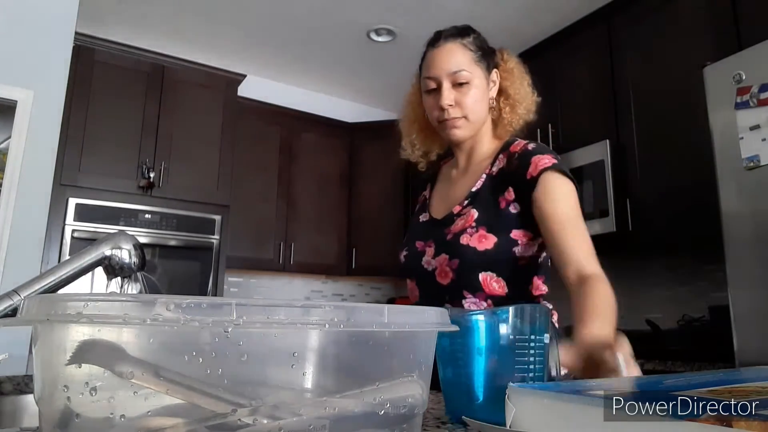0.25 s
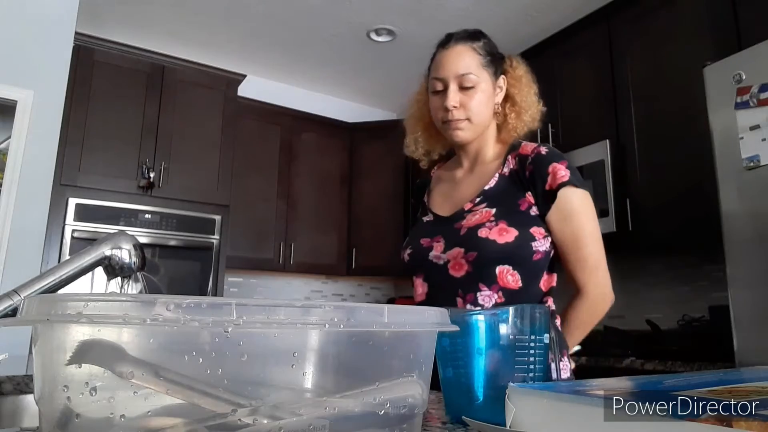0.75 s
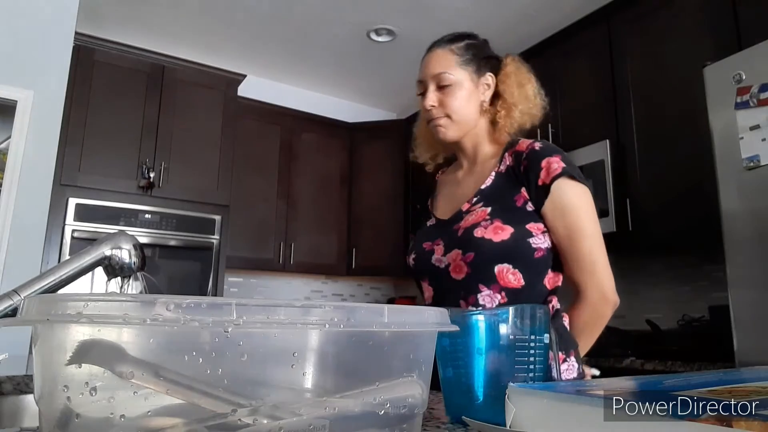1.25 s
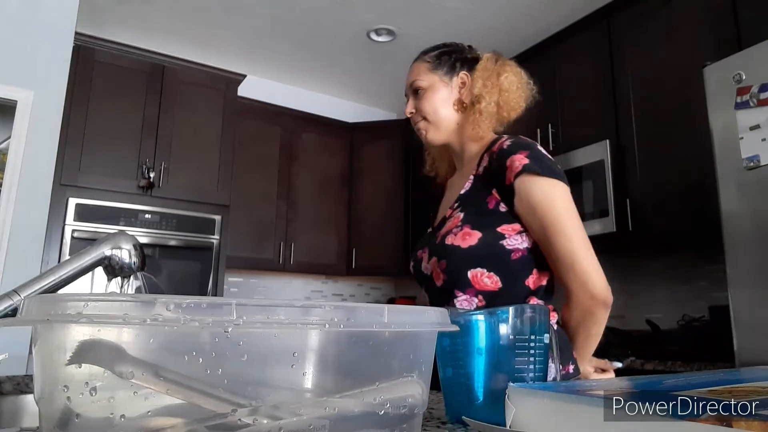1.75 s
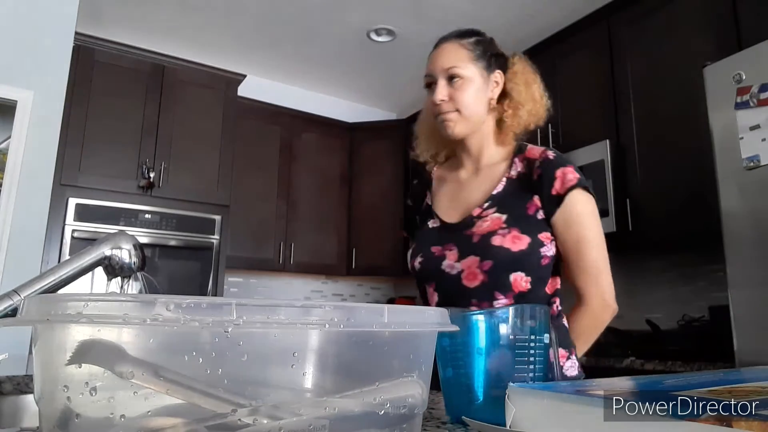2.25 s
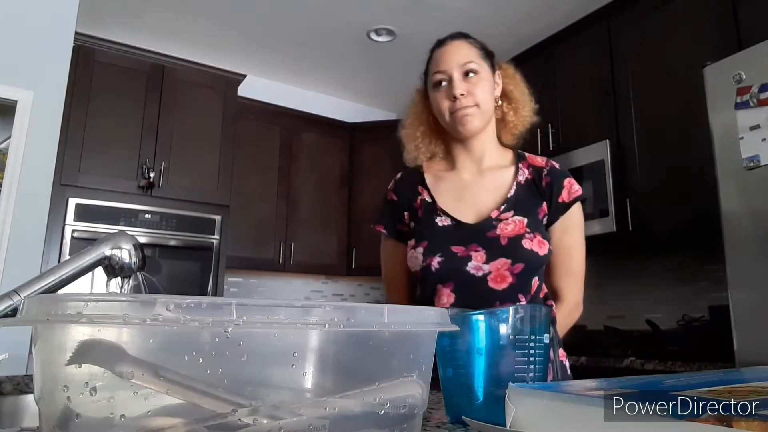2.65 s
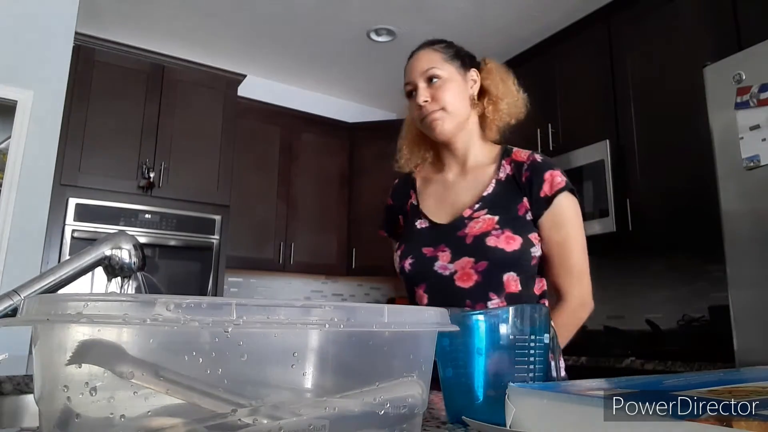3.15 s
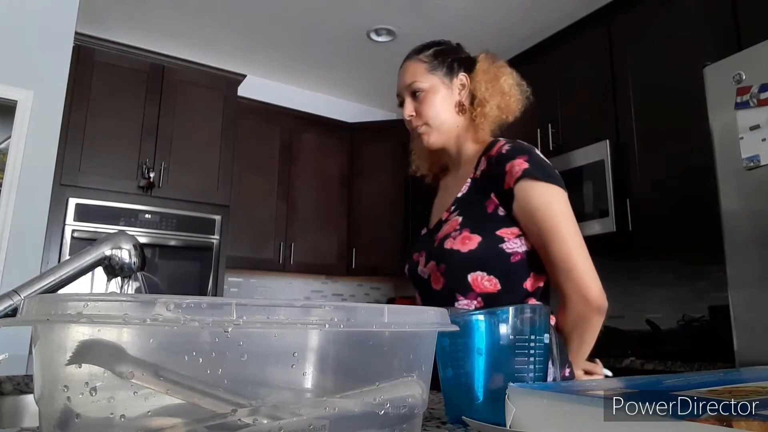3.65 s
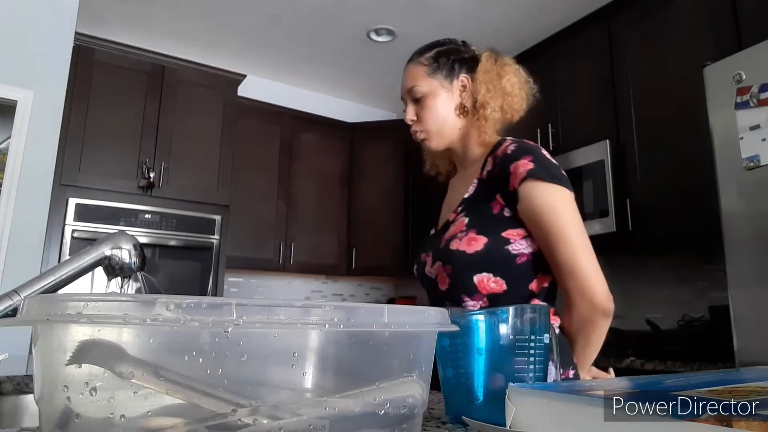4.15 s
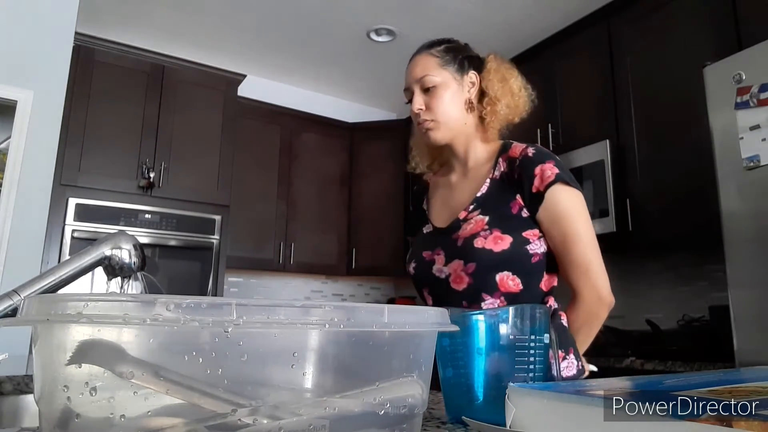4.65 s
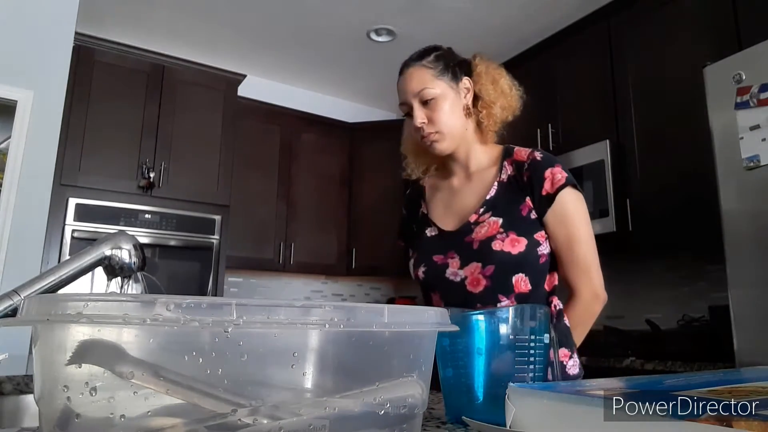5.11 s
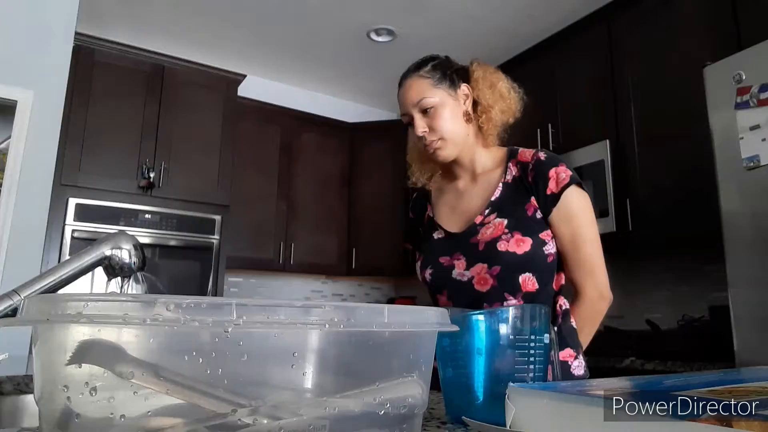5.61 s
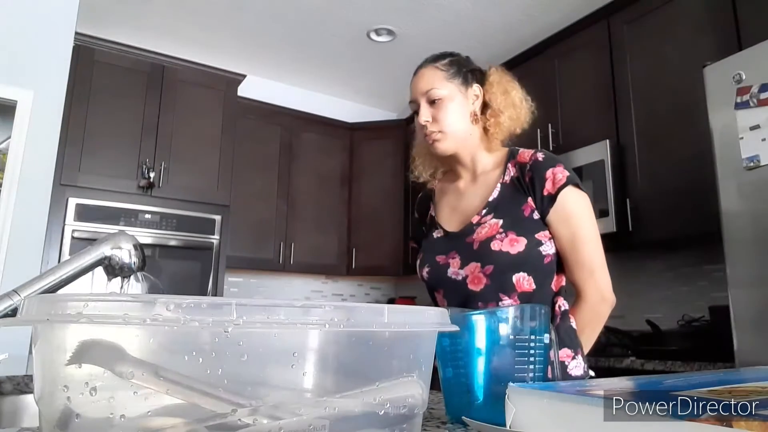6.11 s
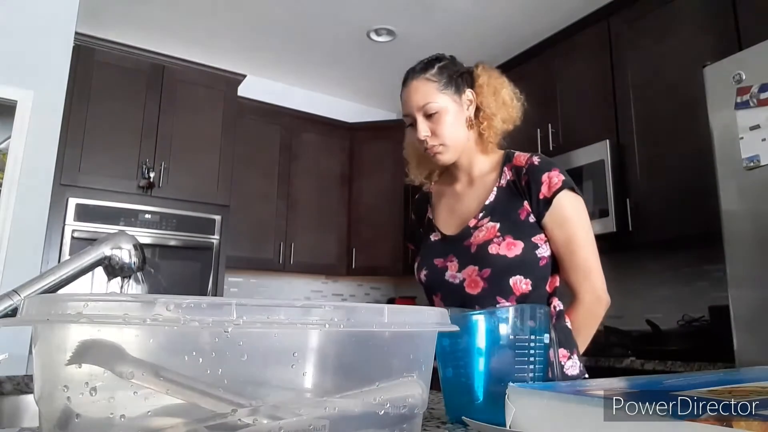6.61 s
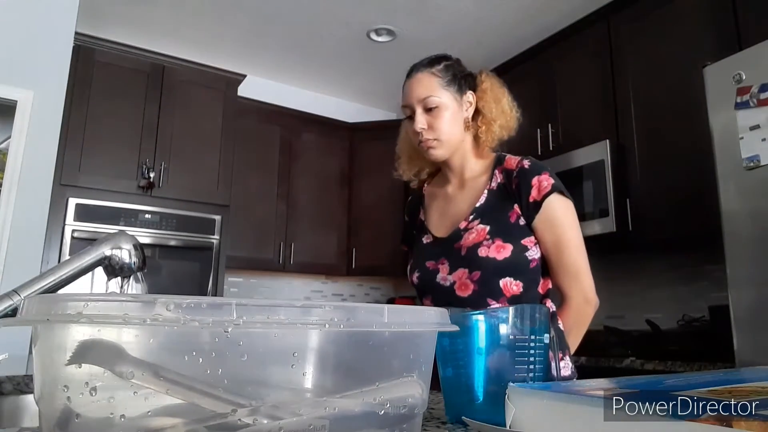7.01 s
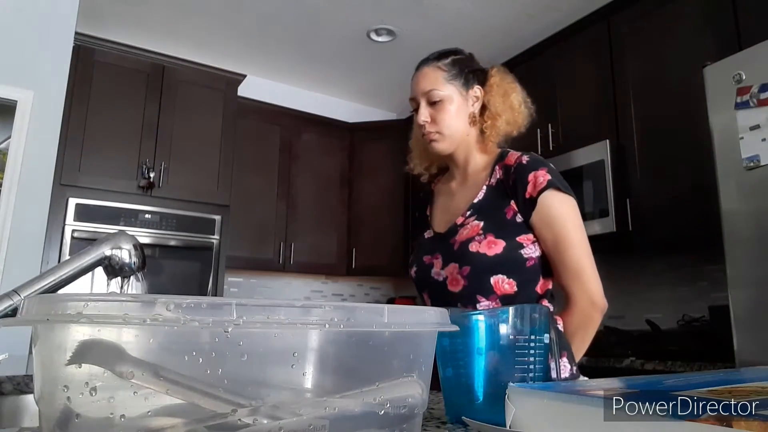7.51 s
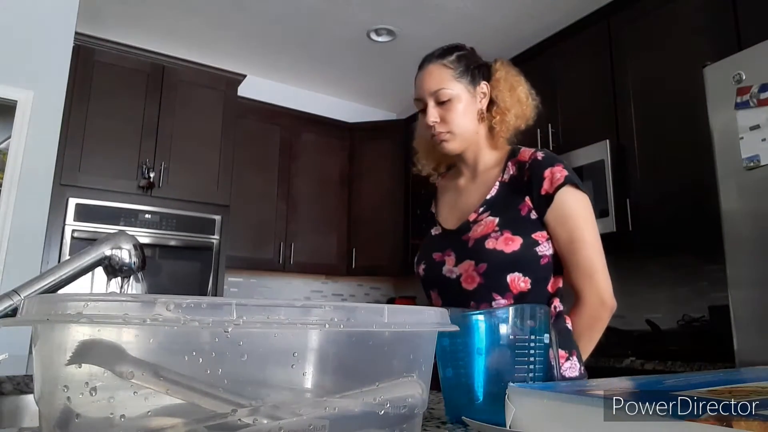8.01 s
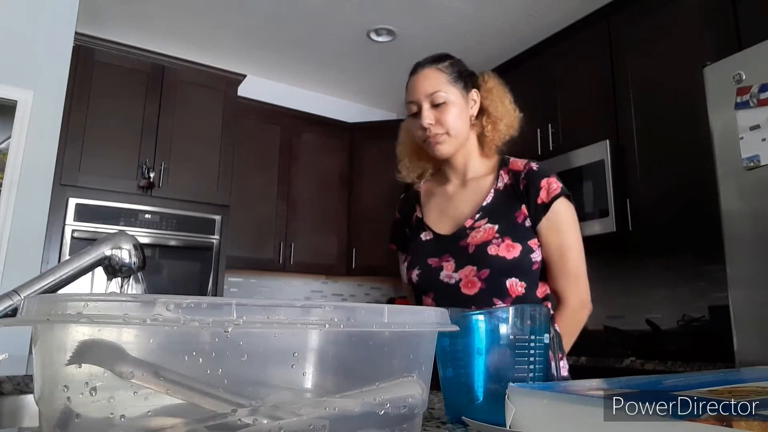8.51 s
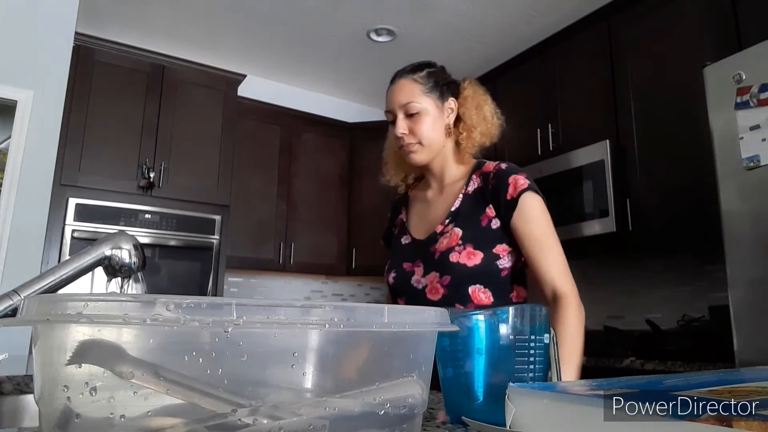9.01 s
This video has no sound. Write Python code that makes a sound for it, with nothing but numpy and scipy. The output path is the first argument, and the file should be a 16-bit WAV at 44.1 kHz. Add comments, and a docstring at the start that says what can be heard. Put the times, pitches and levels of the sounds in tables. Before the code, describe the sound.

Something hard is set down on a kitchen counter with a sharp, briefly ringing knock. Throughout, a tap runs into a part-filled plastic tub close to the microphone. The jet makes a low hollow drumming and a fine fizzing spray, dotted with quick, irregular splats and small bubbly bloops. A motor hums faintly behind it, and the hard walls add a short echo.

```python
"""A hard-walled kitchen, where a tap runs into a part-filled plastic tub close to the microphone.
A motor hums faintly, and something hard is set down on the counter at the start.
The jet drums the tub's walls, churns the water and throws a fine, fizzing spray.
Up front, the air pockets it traps burst in short splats and bloops, and the room rings."""
import sys
import numpy as np
from scipy import signal
from scipy.fft import rfft, irfft
from scipy.io import wavfile
from scipy.ndimage import uniform_filter1d, map_coordinates

SR = 44100
rng = np.random.default_rng(int(sys.argv[2]) if len(sys.argv) > 2 else 0)


def materialize(psi):
    """Save the field psi as 16-bit PCM at rate SR to the path in sys.argv[1].

    A 1-D psi becomes a single channel; in a 2-D psi each row is a channel.
    """
    bounded = np.clip(np.atleast_2d(psi).T, -1, 1)
    quanta = np.round(bounded * 32767).astype(np.int16)
    wavfile.write(sys.argv[1], SR, quanta)


N = 408366
T = np.arange(N) / SR


def undb(db):
    """Decibels to gain."""
    return 10 ** (np.asarray(db) / 20)


def level(x, db):
    """Scale to an rms level."""
    return x * undb(db) / np.std(x)


def unit(x):
    """Scale to unit energy."""
    return x / np.sqrt(np.sum(x ** 2))


def add(out, s, x):
    """Mix x in at s seconds."""
    i = max(int(s * SR), 0)
    out[i:i + len(x)] += x[:N - i]


def on_log(hz, points):
    """Read (Hz, value) points on a log-frequency axis."""
    f, value = np.transpose(points)
    return np.interp(np.log(np.maximum(hz, 1)), np.log(f), value)


def colour(x, points, size=2048):
    """Minimum-phase EQ through (Hz, dB) points."""
    gain = undb(on_log(np.fft.rfftfreq(2 * size, 1 / SR), points))
    cepstrum = irfft(np.log(gain))
    cepstrum[1:size] *= 2
    cepstrum[size:] = 0
    response = irfft(np.exp(rfft(cepstrum)))[:size]
    return signal.fftconvolve(x, response)[:len(x)]


def resonate(x, hz, width):
    """Two-pole resonance, gain 1 at its centre."""
    w = 2 * np.pi * min(hz, .45 * SR) / SR
    a = np.sin(w) * width / hz / 2
    return signal.lfilter([a, 0, -a], [1 + a, -2 * np.cos(w), 1 - a], x + 1e-18)


def ring(x, modes):
    """Drive a bank of resonances."""
    return sum(undb(db) * resonate(x, hz, width) for hz, width, db in modes)


def impacts(per_s, spread_db):
    """Randomly timed clicks, many small and a few large."""
    hit = rng.random(N) < per_s / SR
    return hit * rng.choice([-1, 1], N) * undb(spread_db * np.minimum(rng.exponential(size=N), 5))


def walk(per_s):
    """A wandering control signal: random values joined by ramps, spread 1."""
    return level(np.interp(T * per_s, np.arange(N), rng.standard_normal(N)), 0)


def scatter(spread_s, size=4096, count=60):
    """A smeared click: each frequency arrives with its own delay, so the colour stays even."""
    bins = np.arange(size // 2 + 1)
    delay = spread_s * np.interp(bins, np.linspace(0, bins[-1], count), rng.gamma(2, .5, count))
    return irfft(np.exp(-2j * np.pi * np.cumsum(delay) * SR / size))


# the kitchen's reverb time: (frequency [Hz], time to fall 60 dB [s])
KITCHEN_DECAY = [(150, 0.31), (800, 0.68), (2600, 0.71), (7000, 0.78), (15000, 0.38)]
def room(x, echoes, scatter_s, tail_db, build_s):
    """Direct sound, smeared early echoes and the kitchen's diffuse tail; keeps the energy."""
    t = T[:SR]
    noise, hz = rfft(rng.standard_normal(SR)), np.fft.rfftfreq(SR, 1 / SR)
    edges = np.append(0, np.geomspace(200, SR / 2, 10))
    tail = np.zeros(SR)
    for low, high in zip(edges, edges[1:]):
        t60 = on_log((low + high) / 2, KITCHEN_DECAY)
        tail += irfft(noise * ((hz >= low) & (hz < high)), SR) * undb(-60 * t / t60)
    response = undb(tail_db) * unit(tail * (1 - np.exp(-t / build_s)))
    response[0] += 1
    for delay, db in echoes:
        add(response, delay, undb(db) * scatter(scatter_s))
    return signal.fftconvolve(x, unit(response))[:N]


def motor_hum(hz=116.4):
    """A faint bed: a motor hums at twice its shaft rate, under a louder octave; its phase wanders."""
    drift = 1.18 * np.cumsum(rng.standard_normal(N)) / np.sqrt(SR)
    phase = 2 * np.pi * hz * T + drift
    return level(np.sin(phase), -67) + level(np.sin(2 * phase), -55.5)


# the object knocks twice on the counter, then echoes and its ring swells again:
# (time [s], level [dB], mode tilt [dB/decade])
KNOCK_PULSES = [(-0.005, 13, 12.5), (0.0237, 10, -10.5), (0.0405, 2.5, 31), (0.0522, 2, 19),
                (0.089, -8, 32)]
# ring of the object and counter: (frequency [Hz], width [Hz], level [dB])
OBJECT_MODES = [(600, 28, 0), (682, 67, 17.5), (785, 24, 11), (890, 14, 7), (1076, 19, 11), (1193, 11, 20),
                (1270, 2.2, 14), (2020, 39, -15), (2354, 45, 8), (2380, 41, 5), (2520, 33, 6),
                (2655, 23, 1), (2890, 20, -23), (4210, 72, -9), (4425, 70, -7), (4580, 79, -12),
                (4795, 43, -11.5), (4820, 38, -15), (6140, 80, -13.5)]
# tone of the knock's crack: (frequency [Hz], level [dB])
CRACK_EQ = [(30, -38), (70, -13), (130, -5), (230, -2), (450, 1), (680, 11.5), (850, 11), (1030, -1),
            (1350, -6.5), (1900, -11), (3200, -20), (6000, -55), (9000, -27), (15000, -38)]
# early echoes off the cabinets: (delay [s], level [dB])
CABINET_TAPS = [(0.0048, -4), (0.017, -4), (0.0285, -7.5)]
def counter_knock(size=32768):
    """Two knocks and their echoes layer ring, thud and crack; more tilt is brighter, with less crack."""
    out, blow = np.zeros(N), signal.unit_impulse(size)
    lead = SR // 10  # pre-roll for a knock just before time zero
    thud = undb(-26.5) * unit(resonate(blow, hz=250, width=32))
    for s, db, tilt in KNOCK_PULSES:
        modes = [(hz, width, mode_db + tilt * np.log10(hz / OBJECT_MODES[0][0]))
                 for hz, width, mode_db in OBJECT_MODES]
        body = undb(-6.5) * unit(ring(blow, modes))
        crack = undb(-4 - tilt / 2) * unit(colour(blow, CRACK_EQ))
        add(out, s + lead / SR, undb(db) * (body + thud + crack))
    heard = room(out, CABINET_TAPS, scatter_s=0.0001, tail_db=2.5, build_s=0.0019)
    return np.pad(heard[lead:], (0, lead))


# the jet's strength, ridden like a fader: (time [s], level [dB])
JET_STRENGTH = [(0.45, -44.5), (0.52, -44), (0.57, -59), (0.62, -43.5), (0.87, -48), (1.26, -43.5),
                (1.92, -43.5), (1.94, -52), (2.29, -41.5), (2.31, -54), (2.44, -48.5), (3.34, -45.5),
                (3.39, -54), (3.46, -43.5), (3.56, -58), (3.59, -48), (4.2, -43), (4.27, -53),
                (4.52, -44.5), (4.56, -48.5), (4.74, -41.5), (4.96, -53.5), (4.98, -44), (5.18, -47),
                (5.23, -38), (5.25, -48.5), (5.47, -52.5), (5.5, -43.5), (5.89, -46.5), (5.94, -61),
                (6.04, -43.5), (6.18, -52.5), (6.6, -41.5), (6.72, -52), (6.77, -44.5), (6.87, -56.5),
                (6.92, -44), (7.07, -47.5), (7.24, -43), (7.51, -45), (7.56, -54.5), (7.75, -41.5),
                (8.17, -51.5), (8.44, -45.5), (8.93, -49), (9.0, -40), (9.1, -52), (9.25, -45.5)]
def jet_swell(flutter_db=1.77):
    """The jet swells and flutters quickly at random; in dB around its mean."""
    jet_db = np.interp(T, *np.transpose(JET_STRENGTH)) + flutter_db * walk(per_s=20)
    return jet_db - jet_db.mean()


# hollow body of the tub with its water: (frequency [Hz], width [Hz], level [dB])
TUB_BODY = [(209.4, 3.9, 3), (218.4, 2.8, 0.5), (244.3, 5.4, 5.5), (267, 4, 7), (459.6, 9, -7),
            (573, 5.4, -9), (658, 5.1, -10.5), (705.4, 7.5, -11), (1117, 15, -22.5)]
# dull churn of the plunging jet: (frequency [Hz], level [dB])
CHURN_EQ = [(25, -42), (40, -19), (55, 3), (95, -3), (160, 1), (310, -23), (380, 5), (650, 10.5),
            (900, -17.5), (1200, -4), (2200, -40), (4000, -20)]
def drumming(drum_db, slosh_s=0.002003):
    """The low end: the jet churns the water and pummels the tub, whose pitch sways with the slosh."""
    walls = level(ring(impacts(per_s=900, spread_db=1), TUB_BODY), 0.021)
    swayed_time = T + slosh_s * walk(per_s=4)
    walls = map_coordinates(walls, [swayed_time * SR], order=1, mode="mirror")
    churn = colour(impacts(per_s=1800, spread_db=2.5), CHURN_EQ)
    churn = room(churn, [], scatter_s=.001, tail_db=-8, build_s=0.00085)
    return (walls + level(churn, -9.5)) * undb(drum_db)


def fizz(per_s=14, low_hz=4260, high_hz=14800, count=200):
    """Clusters of like-sized bubbles burst at uneven intervals, each a soft puff at its own pitch."""
    out = np.zeros(N)
    times = np.cumsum(rng.gamma(2, .5, count)) / per_s
    for s, strength, fineness in zip(times, rng.standard_normal(count), rng.random(count)):
        hz = low_hz * (high_hz / low_hz) ** fineness
        width = 0.38 * hz
        crackle = scatter(spread_s=0.0049, count=240)
        puff = resonate(resonate(crackle, hz, width), hz, width)
        if s < T[-1]:
            add(out, s, undb(-30 + 0.5 * strength) * unit(puff))
    return out


# bright sheen of the fine spray: (frequency [Hz], level [dB])
SPRAY_EQ = [(500, -15), (1200, -3), (2200, -1), (3000, -8), (4800, -1.5), (7000, -3), (10000, 0),
            (15500, 0.5)]
def spray(spray_db, spurt_s=0.012):
    """Tiny droplets tick on the water, flaring in little spurts."""
    kicks = np.abs(impacts(per_s=26, spread_db=1.5))
    spurts = signal.lfilter([1], [1, -np.exp(-1 / (SR * spurt_s))], kicks)
    drops = impacts(per_s=2600, spread_db=3.5) * (1 + 1.5 * spurts)
    return level(colour(drops, SPRAY_EQ), 0) * undb(spray_db)


# lulls in the spray, active only where end follows start: (start [s], end [s])
SPRAY_LULLS = [(0.44, 0.64), (0.71, 0.78), (0.9, 0.97), (1.75, 1.84), (2.02, 2.11), (2.44, 2.53),
               (3.28, 3.36), (3.49, 3), (4.27, 4.3), (4.87, 4.9), (5.87, 5.8), (6.1, 5.2), (6.29, 6),
               (6.8, 6.9), (7.53, 8.1), (8.02, 4.93), (8.85, 8.6)]
def sputter(duck_db=-8.5):
    """Gain that ducks spray and fizz, with 10 ms fades, while the jet runs smoothly."""
    smooth = sum((T > start) * (T < end) for start, end in SPRAY_LULLS)
    return undb(duck_db * uniform_filter1d(smooth.astype(float), SR // 100))


def bubble_band(x, low_hz, high_hz):
    """A bubble cluster's tone: a bumpy plateau from its largest to its smallest bubbles."""
    hz = np.geomspace(300, SR / 2, 56)
    octaves_below = np.maximum(np.log2(low_hz / hz), 0)
    octaves_above = np.maximum(np.log2(hz / high_hz), 0)
    bumps_db = 0.95 * rng.standard_normal(len(hz))  # single bubbles stand out
    db = bumps_db - 22.5 * octaves_below - 17.5 * octaves_above
    return unit(colour(x, np.column_stack([hz, db])))


def splat(low_hz, high_hz, lag_s_per_oct=0.000501, size=4096):
    """One air pocket collapses in a tight splat whose lows lead its highs."""
    hz = np.fft.rfftfreq(size, 1 / SR)
    start_hz = .7 * low_hz
    delay = lag_s_per_oct * np.log2(np.clip(hz, start_hz, high_hz) / start_hz)
    rise = np.exp(-2j * np.pi * np.cumsum(delay) * SR / size)
    crackle = scatter(spread_s=.0025, count=120)
    return bubble_band(irfft(rfft(crackle) * rise), low_hz, high_hz)


def bloop(hz, decay_cycles=1.2, glide_ratio=1.123, size=4096):
    """The trapped bubble swells into a short note that glides upward and dies."""
    age = T[:size] * hz / decay_cycles  # in decay times
    pitch = hz * glide_ratio ** (np.minimum(age, 4) - 1.5)
    note = age * np.exp(-age) * np.sin(2 * np.pi * np.cumsum(pitch) / SR)
    return unit(signal.fftconvolve(note, scatter(spread_s=0.00119))[:size])


def bursts(pockets, splat_trim_db=-0.5, bloop_trim_db=-1.26, bloop_lag_s=.001):
    """Each air pocket bursts in a splat, and the bubble it leaves rings with a bloop."""
    out = np.zeros(N)
    for s, splat_db, low_hz, high_hz, bloop_db, bloop_hz in pockets:
        add(out, s, undb(splat_db + splat_trim_db) * splat(low_hz, high_hz))
        add(out, s + bloop_lag_s, undb(bloop_db + bloop_trim_db) * bloop(bloop_hz))
    return out


# air pockets bursting at the surface, levels before trim:
# (time [s], splat level [dB], low edge [Hz], high edge [Hz], bloop level [dB], bloop pitch [Hz])
AIR_POCKETS = [(0.3449, -19.5, 1200, 11200, -21, 3780), (0.6202, -12.5, 9790.0, 14460.0, -30.5, 3680.0),
               (0.6534, -17.5, 2600, 3940, -32, 1150), (0.789, -20, 1170, 7210.0, -32, 14020.0),
               (0.8555, -19.3, 2770, 3330.0, -19.5, 1890), (1.019, -29, 4080, 8800, -26, 5300),
               (1.1103, -16, 1170, 11080.0, -19, 3540.0), (1.173, -16.3, 3660, 11470.0, -26, 2260),
               (1.2359, -0.7, 1630, 3040, -14, 1920), (1.2981, -13, 2570, 12000, -13.5, 2870),
               (1.3616, -27.8, 2670.0, 7340.0, -22, 6300), (1.4865, -12.5, 1210, 10500, -14.5, 3080),
               (1.5924, -17.5, 2540, 7910.0, -20, 4330), (1.6355, -14.5, 7340.0, 14930.0, -30, 1170),
               (1.6937, -21, 2570, 3090.0, -24, 4700), (1.855, -27, 1170, 13150.0, -33, 7600.0),
               (1.9453, -15.6, 4520.0, 5000, -34, 12780.0), (2.1195, -21, 4900, 14500, -17, 14000),
               (2.1681, -16, 1660.0, 10160.0, -24.5, 1200), (2.3507, -19.5, 1200, 13850.0, -20, 9560.0),
               (2.3942, -18, 2340, 5000, -21.5, 7180.0), (2.6026, -12, 2550, 5640, -18, 3080),
               (2.7324, -19.5, 1580.0, 12900.0, -23, 8770.0), (2.9127, -12.1, 2740, 13390.0, -29, 1667),
               (2.9836, -27.5, 1145, 3510.0, -18, 11920.0), (3.0784, -15.5, 2280, 2920, -16.7, 2200),
               (3.1312, -16.5, 2880.0, 11510.0, -29, 1210), (3.1748, -18, 2330, 3780, -20, 4810.0),
               (3.4531, -22.5, 1560.0, 12710.0, -22.5, 4000), (3.594, -23.5, 1420, 12420.0, -28, 1270),
               (3.6765, -14.5, 3130, 13670.0, -26.5, 1270), (3.7349, -23.8, 3030, 14340.0, -33, 1380.0),
               (3.8726, -24, 1180.0, 12300.0, -25, 5570.0), (3.9473, -22, 3060, 10140.0, -37, 1110),
               (4.0172, -21.5, 3650.0, 15500, -21, 12550.0), (4.1327, -25, 1340, 15500, -18, 11900),
               (4.2039, -25.1, 2850.0, 7390.0, -30, 1180), (4.3705, -26, 1190, 14260.0, -26, 6750),
               (4.4297, -24.1, 4360.0, 7790.0, -30, 5450.0), (4.5019, -17.5, 1210, 12710.0, -19, 3600),
               (4.5778, -20, 4790.0, 8250.0, -32, 12110.0), (4.6784, -17.5, 1670, 14750.0, -22, 5140),
               (4.9458, -19, 1200, 11840.0, -18.7, 2810.0), (5.0932, -14, 2180, 11000, -14.5, 3570),
               (5.1916, -16.5, 4140.0, 12940.0, -28, 1250), (5.3725, -21, 1420, 13530, -35, 1200.0),
               (5.4173, -22.5, 2300, 5370.0, -18.5, 3190.0), (5.494, -10, 2420, 12960.0, -11.2, 5150),
               (5.685, -20.5, 3320, 10810.0, -44, 1340), (5.7672, -12.5, 1880, 10300, -11.5, 2860),
               (5.9815, -16.8, 1680, 12660.0, -35, 1150.0), (6.2667, -24.7, 3120.0, 15500, -25, 4200.0),
               (6.3674, -19, 2690, 8900.0, -25.2, 3930.0), (6.4043, -11, 2020, 3870, -8, 2430),
               (6.4132, -24, 2270, 3100, -28, 2400), (6.581, -16.5, 7200, 11500, -17, 10500),
               (6.6858, -19, 6330.0, 14930.0, -27, 12940.0), (6.7584, -46, 1261, 14640.0, -22, 12860.0),
               (6.9101, -8, 3620, 8000, -11, 5370), (7.0516, -27, 2180.0, 14930.0, -33, 1540.0),
               (7.1431, -28, 1980.0, 15600, -17, 12200), (7.2, -17, 5200, 7960, -26, 7400),
               (7.2132, -14, 5530, 7000, -19, 7400), (7.3402, -24, 5370.0, 15500, -31.2, 2920.0),
               (7.4152, -13.5, 5200, 14680.0, -27, 1810), (7.6183, -23, 3780.0, 7760, -32, 2240.0),
               (7.6532, -20.5, 1170, 13160.0, -23, 4790), (7.6939, -15.5, 1750, 15500, -13, 2700),
               (7.7515, -4, 2770, 7300, -11, 4000.0), (7.9299, -17, 12050.0, 12570.0, -24, 5110.0),
               (8.2007, -19, 1630, 6310.0, -29, 11780.0), (8.3291, -14, 2150, 5540, -14.5, 2620),
               (8.4258, -7.5, 4730.0, 11200, -26, 2490), (8.512, -18.5, 7910.0, 15500, -31, 7950.0),
               (8.5858, -21, 8840.0, 15500, -16, 14240.0), (8.7112, -21, 6200, 14810, -31, 2930),
               (8.8023, -26, 2990.0, 6280.0, -25, 5530), (8.9619, -25.5, 1660.0, 11710.0, -32, 1210),
               (9.1614, -23, 4650, 8100, -22, 6320)]
# early echoes off the tub's walls: (delay [s], level [dB])
TUB_TAPS = [(0.0086, -7.5), (0.0172, -2), (0.0217, -5)]
def splashing(spot_count=4):
    """The lead layer: pockets burst at several spots in the tub, each with its own reverb."""
    spots = [bursts(AIR_POCKETS[k::spot_count]) for k in range(spot_count)]
    return sum(room(spot, TUB_TAPS, scatter_s=0.000703, tail_db=4.5, build_s=0.0038) for spot in spots)


def scene():
    """The mix: one jet rides the drumming and spray; fizz, splashes, knock and hum join them."""
    swell_db = jet_swell()
    mist = sputter() * (fizz() + spray(spray_db=-56 + 0.61 * swell_db))
    splashes = splashing()
    hiss = room(mist, [], scatter_s=.001, tail_db=2.5, build_s=0.0033)
    drum = drumming(drum_db=-47 + 0.55 * swell_db)
    return (splashes + hiss + drum + counter_knock() + motor_hum())[None]


# treble ripple of the microphone port: (frequency [Hz], level [dB])
PORT_EQ = [(5600, 0), (6700, -2.5), (7800, 2.5), (8700, -4.5), (10000, -1), (11000, -2.5), (12200, 1),
           (13100, -2.5), (13800, -0.5), (15400, 1.5)]
def record(dry, top_hz=15550):
    """The microphone port ripples the treble and a steep low-pass cuts the top."""
    low_pass = signal.ellip(12, .2, 70, top_hz, fs=SR, output="sos")
    return signal.sosfilt(low_pass, colour(dry[0], PORT_EQ))[None]


dry = scene()
out = record(dry)
materialize(out)
```